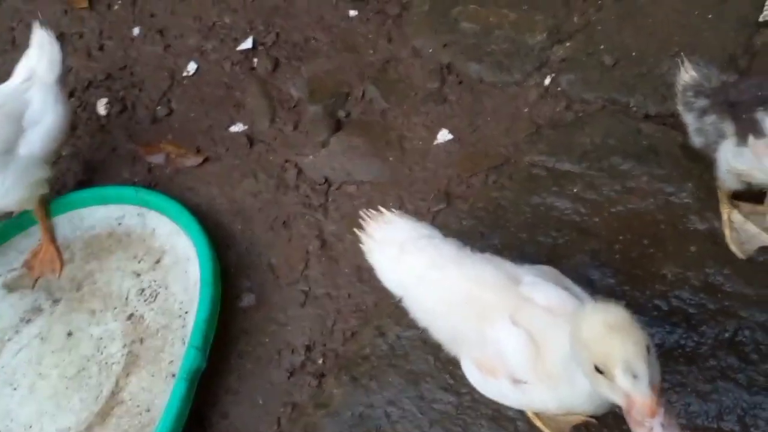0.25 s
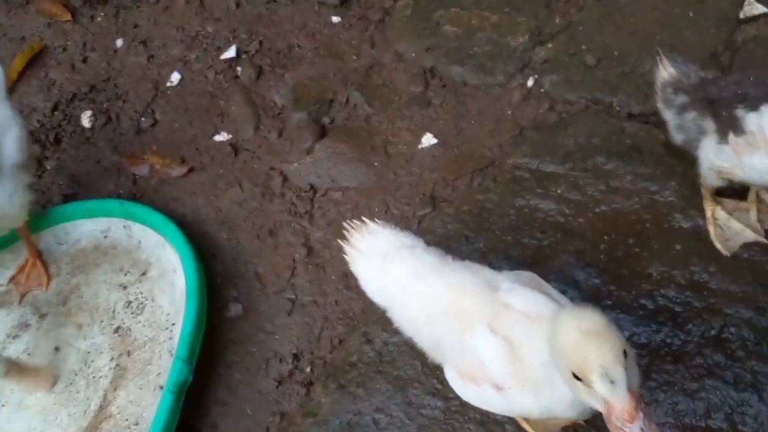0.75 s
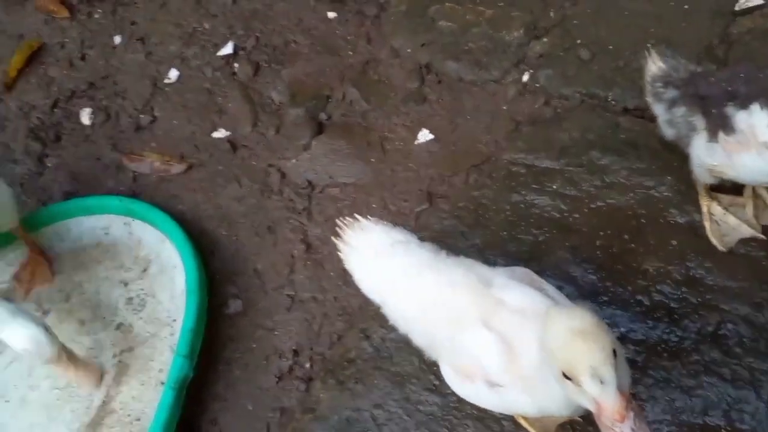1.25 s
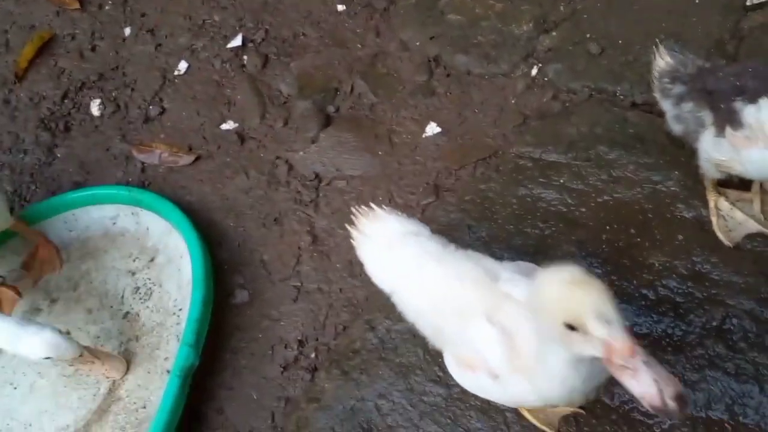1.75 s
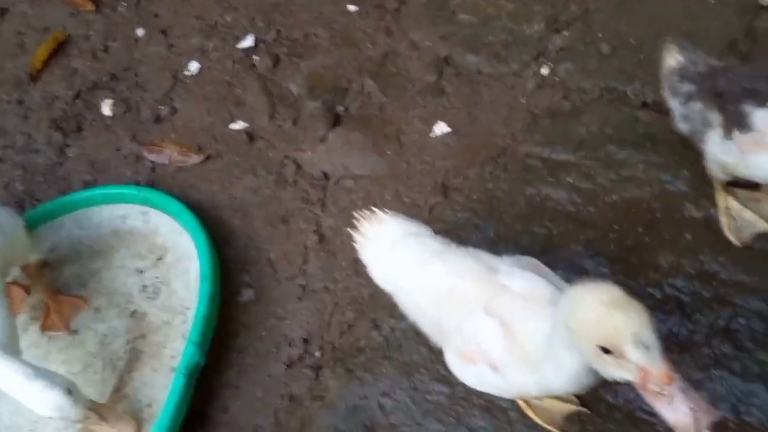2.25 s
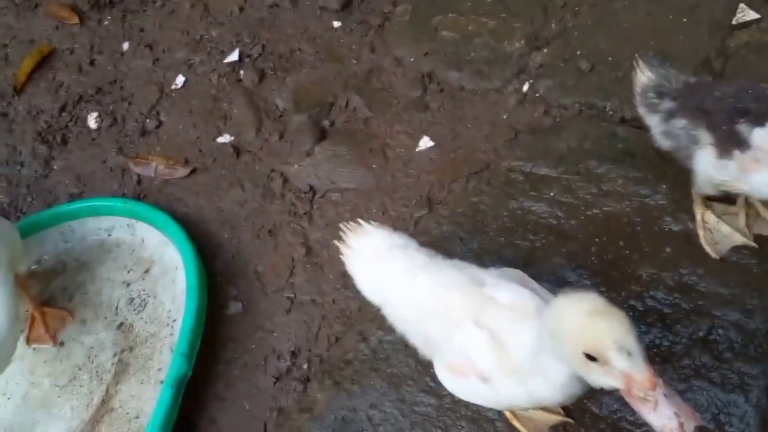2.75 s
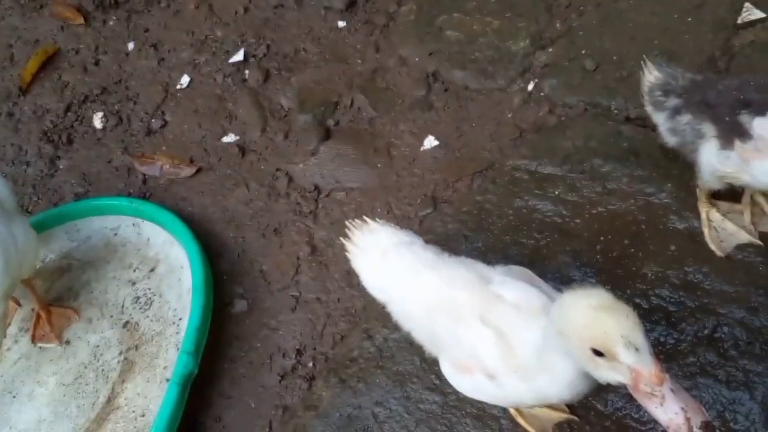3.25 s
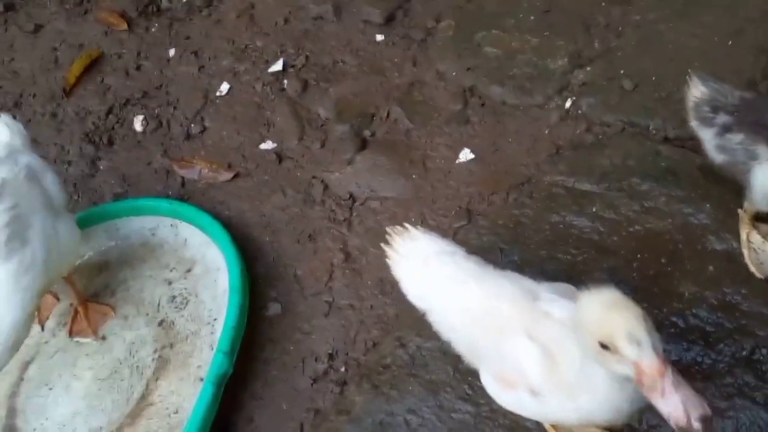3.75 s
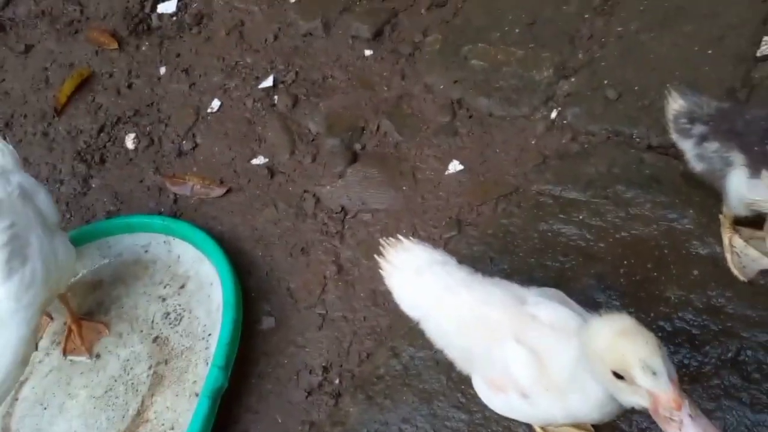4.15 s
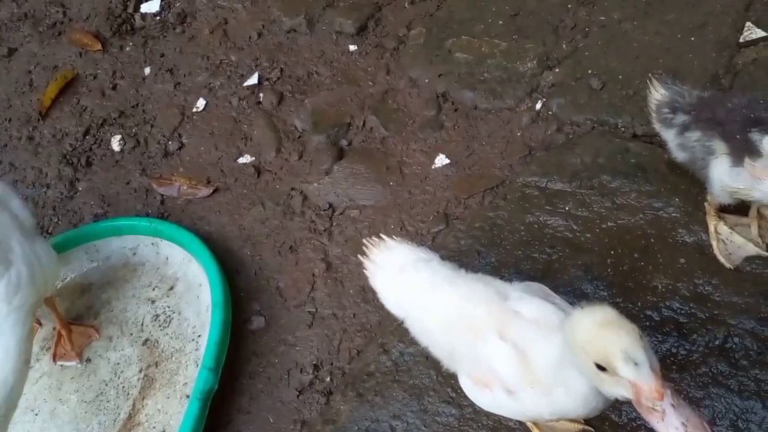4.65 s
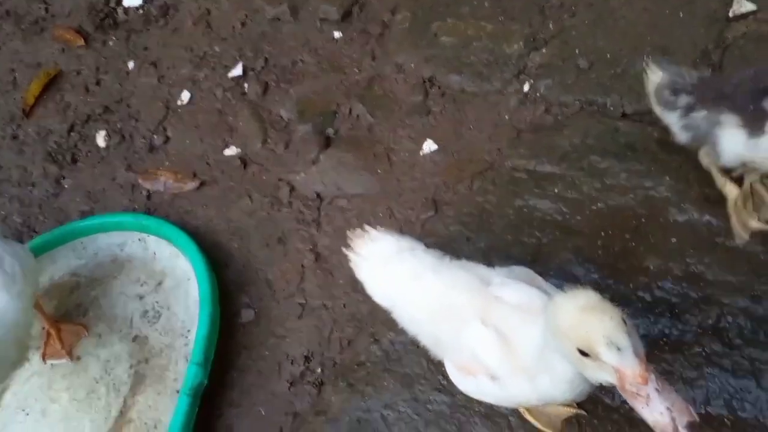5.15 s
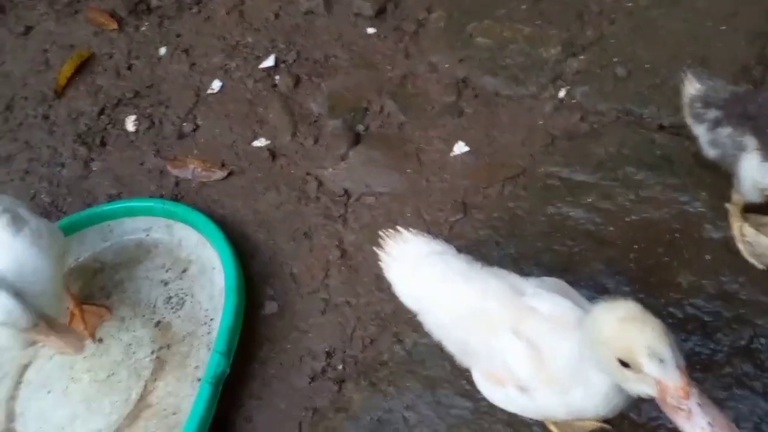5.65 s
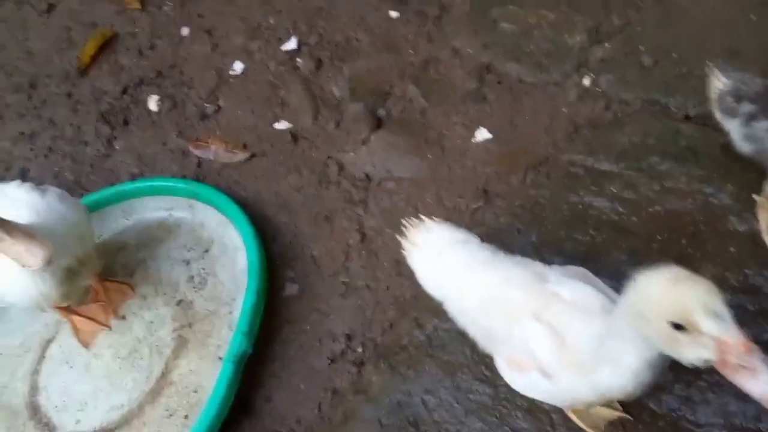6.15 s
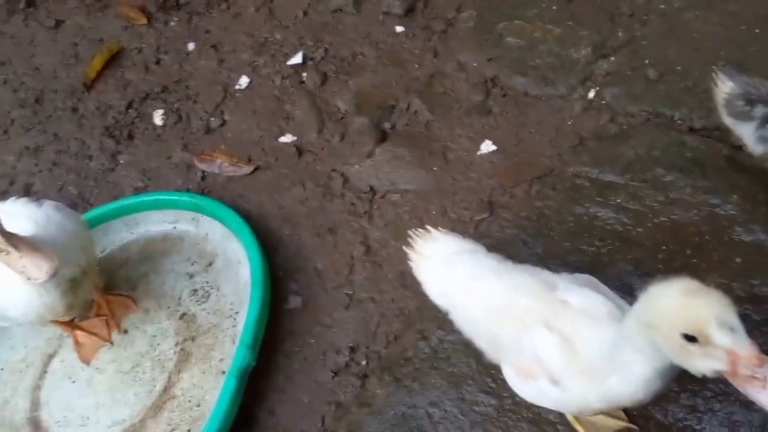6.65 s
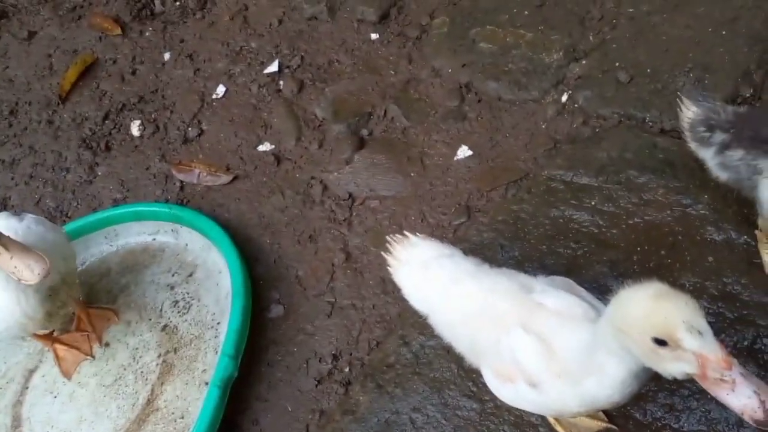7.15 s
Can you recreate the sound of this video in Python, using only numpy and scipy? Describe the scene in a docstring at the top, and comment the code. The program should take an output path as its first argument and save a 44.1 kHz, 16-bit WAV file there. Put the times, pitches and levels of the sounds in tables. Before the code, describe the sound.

Close outdoor sound of young ducks at a shallow plastic basin. At 0.2-0.4 s come three soft, high, wavering peeps, with a few drips. Around 0.8-1.4 s water is stirred and splashed, feet and bill knock the plastic hollowly, and brighter peeps sound at 1.2-1.3. Short hoarse quacks come at 1.5 and 1.9, the latter joined by a strong piercing peep, with a dull thump at 2.0. Peeps run at 2.3-2.5, then faint sliding whines until 3.3. Knocks and sloshing cluster at 3.0-3.9, with two peeps near 3.5. From 4.6 to 5.9 clipped raspy quacks alternate with runs of peeps; a short sizzling hiss passes at 4.9-5.1. Water is churned at 6.0, two knocks follow near 6.35, a quack at 6.6, and final peeps around 7.2. Faint distant chirps, a softly pulsing insect and quiet air continue underneath, with slight yard echo.

```python
"""Wavy peeps in runs and short hoarse quacks: half-grown ducklings beg nearby on wet ground, voices breaking.
The peeps are gliding tones with a faint overtone; the quacks are pulse trains ringing a throat filter.
One dabbles and steps in a shallow plastic basin: blows ring decaying modes, and water is streams of bubbles.
Farther off a small bird chirps and an insect pulses in outdoor air; decaying noise gives a short yard echo."""
import sys
import numpy as np
from scipy import signal
from scipy.fft import rfft, irfft, next_fast_len
from scipy.io import wavfile
from scipy.ndimage import map_coordinates

SR = 44100
rng = np.random.default_rng(int(sys.argv[2]) if len(sys.argv) > 2 else 0)


def pcm_store(signal):
    """Save signal as 16-bit PCM."""
    levels = np.round(np.clip(np.atleast_2d(signal), -1, 1) * 32767)
    wavfile.write(sys.argv[1], SR, levels.astype(np.int16).T)


N = 326340

# Quacks: (time [s], length [s], starting pitch [Hz], chest gain [dB], mouth resonance [Hz],
#          brightness [dB], level of the whistle that leads in [dB])
QUACK_CALLS = [(1.482, 0.05, 256.2, 3.5, 1740, -14, -23), (1.924, 0.05, 252.2, 2.5, 900, -15.5, -26),
               (4.557, .047, 230.5, 2, 1180, -16.5, -36), (4.871, 0.061, 258.6, 7.5, 925, -13, -35),
               (5.218, 0.068, 213.8, -4, 1190, -8.5, -39), (5.542, .05, 240.4, -2, 1380, -9.5, -42),
               (5.871, 0.045, 218.4, -6, 1880, -8.5, -26), (6.631, 0.056, 226.8, -8.5, 1830, -10, -26)]
# How hard the water is stirred: (time [s], level [dB])
STIRRING = [(0.0, -43.5), (0.72, -44.5), (1.03, -31.5), (1.4, -38), (1.63, -45), (2.21, -41), (2.43, -56.5),
            (3.26, -65), (3.4, -45), (3.61, -38.5), (4.88, -44), (4.97, -52.5), (5.87, -47), (6.02, -32),
            (6.18, -44.5), (6.74, -41), (7.11, -55), (7.4, -67)]


def amp(db):
    """Amplitude ratio of a level: 20 dB is a factor of ten."""
    return 10 ** (np.asarray(db) / 20)


def unit(x):
    """Normalise the mean power, so that the rms is 1."""
    return x / np.sqrt(np.mean(x ** 2) + 1e-20)


def along(points, hz):
    """Interpolate (frequency [Hz], value) points on a logarithmic frequency axis."""
    f, v = np.transpose(points)
    return np.interp(np.log(hz + 1), np.log(f + 1), v)


def curves(rows):
    """Piecewise-linear envelopes: one value per sample for each column after the time."""
    s, *cols = np.transpose(rows)
    return [np.interp(np.arange(N) / SR, s, c) for c in cols]


def clock(length):
    """Sampled time axis of a short sound [s]."""
    return np.arange(int(length * SR)) / SR


def wobble(rate, size=N):
    """Band-limited random modulation: a smooth curve through rate random knots a second."""
    knots = rng.standard_normal(int(size * rate / SR) + 4)
    return map_coordinates(knots, [np.arange(size) * rate / SR])


def add(track, s, sound):
    """Superposition: add a sound to a track from time s [s]."""
    part = track[max(round(s * SR), 0):][:len(sound)]
    part += sound[:len(part)]


def coloured(x, db_of_hz):
    """Minimum-phase filter: folding the real cepstrum makes the given gain curve causal."""
    m = 2 * next_fast_len(len(x) // 2 + 2048)
    gain = amp(db_of_hz(np.fft.rfftfreq(m, 1 / SR)))
    cepstrum = irfft(np.log(gain + 1e-6))
    cepstrum[1:m // 2] *= 2
    cepstrum[m // 2 + 1:] = 0
    return irfft(rfft(x, m) * np.exp(rfft(cepstrum)))[:len(x)]


def noise(spectrum, size=N):
    """Filtered white noise of rms 1 with a (frequency [Hz], gain [dB]) spectrum."""
    return unit(coloured(rng.standard_normal(size), lambda f: along(spectrum, f)))


def phase_of(hz):
    """Phase [rad] as the running integral of a pitch curve."""
    return 2 * np.pi * np.cumsum(hz) / SR


def peeps():
    """Frequency modulation through a resonance: pitch crests, dips and crests; the throat band sets loudness."""
    # Peeps: (time of the dip [s], dip pitch [Hz], last crest before overshoot [Hz], relative level [dB])
    peep_calls = [(.198, 2630, 3240, -18.5), (.279, 2610, 2990, -18), (0.397, 2636, 2840, -14),
                  (1.22, 2606, 2920, -15.5), (1.322, 2785, 2930, -9), (1.798, 2580, 3180, -23),
                  (1.889, 2844, 3500, -2), (2.298, 2480, 2615, -23.5), (2.37, 2550, 2990, -16),
                  (2.491, 2716, 3165, -7.5), (3.458, 2555, 2820, -20.5), (3.554, 2683, 2864, -10.5),
                  (4.707, 2430, 2740, -26.5), (4.797, 2596, 3090, -13.5), (4.894, 2660, 2960, -11),
                  (5.025, 2628, 2900, -9), (5.646, 2560, 2920, -23.5), (5.733, 2814, 3340, -9.5),
                  (5.876, 2720, 3010, -14), (7.141, 2546, 2740, -25), (7.239, 2685, 3395, -15)]
    # Breath pressure through a peep: (swings from its dip, level [dB])
    breath_push = [(-2, -28), (-1.1, -17), (-.55, -3), (0, -3), (.65, 0), (1, -6.5), (1.4, -15), (2, -29)]
    # Throat gain: open at low pitch, a dip near 2600 Hz, closing above 3 kHz: (frequency [Hz], gain [dB])
    throat_gain = [(2200, 2.5), (2600, -4.5), (2950, -1.5), (3080, -6.5), (3220, -17), (3600, -22)]
    breath_spectrum = [(1500, -17), (2600, -18), (3400, 8.5), (4500, -10.0), (7000, -6.5), (10000, -12)]
    usual_db, jitter, second_db, breath_db = -14.5, .018, -30, -31
    overshoot, overshoot_swings = .25, .2  # share of the last swing, and its duration in swings
    out = np.zeros(N)
    for s, dip_hz, last_hz, db in peep_calls:
        harder_db = db - usual_db
        # time from dip to crest [s]: wider swings and softer peeps take longer
        half = .018 + .013 * (last_hz - dip_hz) / 1000 - .0003 * harder_db
        first_hz = dip_hz * (1.22 + .009 * harder_db)  # a harder peep has a higher first crest
        swell_db = 4.5 - .25 * harder_db  # a soft peep swells more towards its end

        u = clock(4 * half) / half - 2
        leg = np.floor(u) + (1 - np.cos(np.pi * (u % 1))) / 2  # cosine glide between turning points
        hz = np.interp(leg, np.arange(-2, 3), [2500, first_hz, dip_hz, last_hz, 2250])
        hz = hz + overshoot * (last_hz - dip_hz) * np.exp(-((u - 1) / overshoot_swings) ** 2)
        hz = hz * (1 + jitter * np.abs(u) * wobble(714, len(u)))  # steady in the middle, ragged at the ends

        push = amp(db + np.interp(u, *np.transpose(breath_push)) + swell_db * np.clip(u, -1, 1))
        push = push * amp(2.5 * np.abs(u) * wobble(300, len(u)))  # the weak ends flicker

        phase = phase_of(hz)
        overtone_gain = amp(second_db + 3 * wobble(400, len(u)))
        overtone = overtone_gain * np.sin(2 * phase + .5 * wobble(900, len(u)))
        breath = amp(breath_db) * noise(breath_spectrum, len(u))
        reediness = np.maximum(push / amp(-14), amp(-30)) ** -.3  # soft notes are reedier than loud ones
        note = amp(along(throat_gain, hz)) * np.sin(phase) + reediness * overtone + breath
        add(out, s - 2 * half, push * note * signal.windows.tukey(len(u), .1))
    return out


def quacks():
    """Source-filter voice: the syrinx slaps shut 210-280 times a second; slaps and air puffs ring the throat."""
    # Effort through a quack: (share of its length, level [dB])
    effort_curve = [(0, -3.5), (.2, 9.5), (.45, 15), (.7, 0.5), (1, 9.5)]
    # Throat and bill transfer function: (frequency [Hz], gain [dB])
    throat_gain = [(120, -19), (230, 6.5), (500, 0.5), (680, -4.5), (950, -4), (1300, -3), (1850, -3),
                   (2250, -3.5), (3000, -8.5), (3800, 0), (4900, -8), (5650, -5.5), (6900, -14),
                   (12000, -30.5)]
    puff_spectrum = [(300, -1.0), (900, 12.0), (3000, 9)]
    level_db, pitch_rise = -15, .06  # rms while sounding; share of the pitch gained
    mouth_db, mouth_width, slack_db = 7, .098, -14
    clear_hz, clear_rough, rough_per_hz = 220, .22, .012  # hoarser above the easy pitch
    out = np.zeros(N)
    for s, length, pitch_hz, chest_db, mouth_hz, bright_db, _ in QUACK_CALLS:
        rough = np.clip(clear_rough + rough_per_hz * (pitch_hz - clear_hz), 0, 1)
        u = clock(length) / length
        hz = pitch_hz * (1 + pitch_rise * u) * (1 + .06 * rough * wobble(400, len(u)))
        turns = phase_of(hz) / (2 * np.pi)
        slaps = unit(np.diff(np.floor(turns), prepend=-1))
        puffs = unit(rng.standard_normal(len(u)) * np.exp(-3 * (turns % 1)))
        puffs = coloured(puffs, lambda f: along(puff_spectrum, f))
        effort = amp(np.interp(u, *np.transpose(effort_curve)) + 2.9 * rough * wobble(380, len(u)))
        source = effort * (slaps - slaps.mean() + .7 * rough * puffs)

        def tense_db(f):
            """Vocal-tract resonance: throat, chest, brightness and a mouth peak add in dB."""
            mouth = mouth_db * np.exp(-(np.log((f + 1) / mouth_hz) / mouth_width) ** 2)
            chest = along([(500, chest_db), (900, 0)], f)
            brightness = along([(1900, 0), (4500, bright_db)], f)
            return along(throat_gain, f) + chest + brightness + mouth

        def slack_tone_db(f):
            """Spectral tilt: a slack voice has weaker high frequencies."""
            return tense_db(f) + along([(1500, 0), (4000, slack_db)], f)

        # the edge comes after the first slaps and fades early
        tense = np.interp(u, [0, .22, .45, 1], [0.19, 1, 0.75, 0.42])
        room_to_ring = ((0, 0), (0, SR // 50))
        hard, soft = np.pad([source * tense, source * (1 - tense)], room_to_ring)
        voice = dispersed(coloured(hard, tense_db) + coloured(soft, slack_tone_db))
        add(out, s, amp(level_db) * voice / np.std(voice[:len(u)]))
    return out


def dispersed(x, lag=.0022):
    """Dispersion: the windpipe draws each slap out, delaying higher frequencies by up to lag [s]."""
    hz = np.fft.rfftfreq(len(x), 1 / SR)
    delay = lag * (1 - np.exp(-hz / 2500))
    cycles = np.cumsum(delay) * hz[1]  # phase is the integral of group delay
    return irfft(rfft(x) * np.exp(-2j * np.pi * cycles), len(x))


def slurs():
    """Pitch glides: soft notes between the peeps, and a falling whistle that breaks into each quack."""
    # Soft slurred notes: (time [s], length [s], from pitch [Hz], to pitch [Hz], level [dB])
    soft_notes = [(0.137, 0.078, 1050, 1395, -29), (0.718, 0.077, 2200, 2600, -39.5),
                  (0.784, 0.038, 2850, 2450, -33), (1.139, .089, 1685, 1356, -27.5),
                  (1.187, 0.026, 1454, 823, -28), (2.236, 0.057, 2330, 2740, -40),
                  (2.423, 0.065, 2800, 2370, -35), (2.518, 0.096, 2790, 2430, -37),
                  (2.596, 0.07, 1008, 1250, -40.5), (2.979, 0.083, 2550, 2240, -42),
                  (3.064, .085, 3140, 2120, -37), (3.172, 0.072, 2635, 2180, -36),
                  (3.31, .059, 2600, 2120, -41.5)]
    out = np.zeros(N)
    for s, length, from_hz, to_hz, db in soft_notes:
        rough = .78 * 1100 / from_hz  # higher notes are cleaner
        add(out, s, amp(db) * slur(length, from_hz, to_hz, rough))
    for s, *_, db in QUACK_CALLS:
        add(out, s - .01, amp(db) * slur(.0277, 1650, 1054, rough=.28))
    return out


def slur(length, from_hz, to_hz, rough):
    """Frequency and amplitude modulation: a gliding whistle of rms 1 that flutters when rough."""
    n = int(length * SR)
    phase = phase_of(np.linspace(from_hz, to_hz, n) * (1 + 0.079 * rough * wobble(678, n)))
    tone = np.sin(phase) + 0.31 * rough * np.sin(2 * phase)
    tone = tone * (1 + rough * wobble(458, n))
    return unit(tone * signal.windows.tukey(n, .7))


def knocks():
    """Modal synthesis: each blow rings the basin's modes at new strengths; sharp blows favour the high ones."""
    # Blows of feet and bills on the basin: (time [s], peak level [dB], sharpness [dB per octave])
    strong_blows = [(.562, -26, -2), (.95, -13, -1), (1.004, -17.5, 1), (1.012, -12, 7),
                    (1.333, -14.5, 0.5), (1.646, -18, -2.5), (1.99, -10.5, -9), (2.33, -13.5, -4.5),
                    (2.954, -21.5, 2.5), (3.001, -16.5, 3), (3.288, -10.5, 1), (3.378, -21.5, -2.5),
                    (3.623, -13.5, -4), (3.72, -13.5, -1), (3.846, -9, -3.5), (5.464, -19, -7),
                    (6.317, -15.5, -6), (6.388, -17.5, -1.5)]
    # Basin modes, damped by its water: (mean frequency [Hz], relative level [dB], decay time t60 [s])
    basin_modes = [(310, -13, .06), (755, -1, .05), (1050, -7, .035), (1300, -7, .03), (1500, -5, .03),
                   (1750, -6, .035), (2080, -6, .03), (2500, -14, .03)]
    slap_spectrum = [(200, -13), (700, 5.5), (2200, 1.0), (5000, -11.0), (12000, -26)]
    slap_gain, slap_t60, onset_s = .62, .021, .00063
    out, t = np.zeros(N), clock(.15)
    for s, db, sharp_db in strong_blows + taps():
        load = rng.normal(1, .04)  # the shifting water retunes the basin
        ring = np.zeros(len(t))
        for hz, mode_db, t60 in basin_modes:
            strength_db = mode_db + 2 * rng.standard_normal() + sharp_db * np.log2(hz / 1000)
            ring += amp(strength_db - 60 * t / t60) * np.sin(2 * np.pi * (hz * load * t + rng.random()))
        slap = slap_gain * noise(slap_spectrum, len(t)) * amp(-60 * t / slap_t60)
        hit = (ring + slap) * (1 - np.exp(-t / onset_s))
        add(out, s - .001, amp(db) * hit / np.abs(hit).max())
    return out


def taps(per_s=6, over_stirring_db=9.5, scatter_db=.5):
    """Random point process: light bill taps follow the stirring; rows of (time, peak level, sharpness)."""
    draws = rng.random((int(per_s * N / SR), 3))
    s = draws[:, 0] * N / SR
    strength, sharpness = scatter_db * (2 * draws[:, 1:].T - 1)
    peak_db = np.interp(s, *np.transpose(STIRRING)) + over_stirring_db + strength
    return list(zip(s, peak_db, sharpness))


def water():
    """Bubble resonance: a bill churns shallow water into small bubbles coloured by the basin, over deep gulps."""
    # Basin's colouring of the churn: (frequency [Hz], gain [dB])
    churn_gain = [(180, -14), (300, -28), (388, -8), (473, -13), (757, -3.5), (860, -3.5), (1010, -3),
                  (2050, -0.5), (2570, -5), (4060, -4), (4740, -10.5), (5790, -18), (9000, -48),
                  (11700, -83), (19800, -120)]
    # A foot or bill shoves water aside: (time [s], length [s], bubbles level [dB], deep gulps level [dB])
    shoves = [(0.848, 0.15, -33.5, -62), (1.338, 0.12, -44, -33.5), (3.468, 0.21, -38.5, -31.5),
              (4.811, 0.057, -43, -27), (5.956, 0.26, -45, -42)]
    wash_spectrum = [(120, -24.5), (230, -8.5), (400, -8.0), (700, -2.5), (1400, -39.0)]
    stirring = amp(curves(STIRRING)[0] + 2 * wobble(14))
    smacks = amp(2.8 * wobble(75))  # the bill works in quick uneven bites
    churn = smacks * (bubbles(900, 1250, .55, 4, 3.5) + .7 * rng.standard_normal(N))
    churn = unit(coloured(churn, lambda f: along(churn_gain, f)))
    # the churning keeps the basin's main mode ringing
    hum = unit(signal.lfilter(*signal.iirpeak(775, 18, SR), churn))
    gulps = bubbles(600, 379, .313, 4.7, 1.2) + .91 * noise(wash_spectrum)
    dabble_gain = amp(.5) * stirring + strokes([(s, length, db) for s, length, db, _ in shoves])
    slosh_gain = amp(-15) * stirring + strokes([(s, length, db) for s, length, _, db in shoves])
    return dabble_gain * (churn + amp(-10) * hum) + slosh_gain * unit(gulps)


def bubbles(rate, centre_hz, spread, cycles, size_db):
    """Damped oscillators: a stream of rising pings of random pitch and size, rms 1, decaying over cycles."""
    count, t = int(rate * N / SR), clock(0.098)
    when, size = rng.random((2, count, 1))
    hz = centre_hz * np.exp(spread * rng.standard_normal((count, 1)))
    strength = amp(-size_db * np.log(0.058 + size))
    grains = strength * np.sin(2 * np.pi * hz * t * (1 + 4 * t)) * np.exp(-t * hz / cycles)
    places = (when * N).astype(int) + np.arange(len(t))
    return unit(np.bincount(places.ravel(), grains.ravel())[:N])


def strokes(rows):
    """Amplitude envelope: a gain that rises, holds and falls for each (time, length, level) row."""
    gain = np.zeros(N)
    for s, length, db in rows:
        add(gain, s, amp(db) * signal.windows.tukey(int(length * SR), .6))
    return gain


def drops():
    """Impact and bubble resonance: a drop lands with a rising ring and a puff of spray; thin ticks join."""
    # Flung drops: (time [s], relative level [dB], starting pitch [Hz], relative spray level [dB])
    flung_drops = [(.4994, -22, 1890, -17), (0.6, -17, 1550, -30), (0.675, -20, 5250, -6),
                   (1.1704, -3.5, 2700, -33), (1.2322, -15, 2800, -15), (1.29, -2, 2230, -21),
                   (1.3354, -15.5, 2860, 0), (1.8174, -15, 2610, -42), (4.6446, -14, 2350, -28),
                   (5.0574, -18, 2780, 5)]
    # Thin high ticks: (time [s], relative level [dB])
    high_ticks = [(0.6751, -4), (1.274, -1), (3.7508, 2)]
    spray_spectrum = [(800, -17), (2500, 14.5), (6000, 5), (10000, -1.5), (14000, -1.0)]
    tick_spectrum = [(3000, -0.5), (9000, -7.5), (13000, 2), (16000, 5.0)]
    ring_t60, spray_t60, tick_t60 = .018, .057, .051  # [s]
    out, t = np.zeros(N), clock(.06)
    for s, db, hz, spray_db in flung_drops:
        bubble = np.sin(2 * np.pi * hz * t * (1 + 4 * t)) * amp(-60 * t / ring_t60)
        spray = noise(spray_spectrum, len(t)) * amp(-60 * t / spray_t60)
        add(out, s, amp(db - 2) * (0.62 * bubble + (0.2 + amp(spray_db - 6)) * spray))
    for s, db in high_ticks:
        tick = noise(tick_spectrum, len(t)) * amp(-60 * t / tick_t60)
        add(out, s - .002, amp(db - 21.5) * tick)
    return out


def spatter(rate=45, spray_t60=.03):
    """Shot noise: fine droplets patter down in showers, with tiny rising pings and puffs of spray."""
    # Showers of fine droplets: (time [s], length [s], level [dB])
    droplet_showers = [(.82, .18, -45), (1.03, 0.34, -40), (6.8, 0.28, -49)]
    landings = (rng.random(N) < rate / SR) * amp(4 * rng.standard_normal(N))
    puffs = signal.fftconvolve(landings, amp(-60 * clock(.06) / spray_t60))[:N]
    spray = unit(puffs * noise([(800, -13), (2500, 6), (6000, -3), (10000, 3), (14000, 3)]))
    pings = bubbles(110, 5000, .5, 18, 2.8)
    return strokes(droplet_showers) * (amp(-2) * pings + amp(-4) * spray)


def rush():
    """Amplitude-modulated noise: a brief sizzling hiss over a low rumble."""
    # Course of the rush: (time [s], hiss level [dB], rumble level before its trim [dB])
    rush_course = [(0, -85, -51), (.35, -85, -66), (4.45, -85, -66), (4.8, -70, -42), (4.88, -29, -37),
                   (5.03, -34, -42), (5.15, -57, -43), (5.35, -80, -46), (5.6, -85, -66)]
    # Hiss spectrum: (frequency [Hz], gain [dB])
    hiss_spectrum = [(2000, -17), (5000, -8), (9000, -12), (12000, -14), (12400, -1), (13600, 0),
                     (14300, -6), (15500, -6)]
    hiss_db, rumble_db = curves(rush_course)
    sizzle = unit(amp(3 * wobble(250)) * noise(hiss_spectrum))
    low = noise([(25, -18), (47, 0), (75, -7), (130, -8), (300, -35), (1000, -80)])
    return amp(hiss_db) * sizzle + amp(rumble_db - 1) * low


def far_bird():
    """Two-voiced sound: paired falling glides make chirps; single ones make whistles, and one pair a rasp."""
    # Falling chirps: (time [s], relative level [dB])
    falling_chirps = [(2.216, -44.5), (3.161, -44.5), (4.098, -46.5), (5.411, -48), (6.476, -50.5),
                      (7.128, -50.5)]
    # Thin whistles: (time [s], from pitch [Hz], to pitch [Hz], relative level [dB])
    thin_whistles = [(1.58, 5340, 5050, -57.5), (3.817, 4887, 4463, -47.5)]
    out = np.zeros(N)
    for s, db in falling_chirps:
        key = rng.normal(1, .035)  # each chirp draws its own pitch
        lower = slur(.05, 4400 * key, 3400 * key, .45)
        upper = slur(.05, 4950 * key, 4550 * key, .45)
        add(out, s, amp(db) * (lower + .6 * upper))
    for s, from_hz, to_hz, db in thin_whistles:
        add(out, s, amp(db) * slur(.13, from_hz, to_hz, rough=.17))
    # in the rasp one voice rises while the other falls
    rasp = slur(.045, 2000, 2400, 1.8) + slur(.045, 3700, 3200, 1.8)
    add(out, 2.612, amp(-43) * rasp)
    return out


def background():
    """Stationary and pulsed noise: outdoor air, and an insect's narrow band pulsing about 8 times a second."""
    # Outdoor air spectrum: (frequency [Hz], gain [dB])
    air_spectrum = [(15, -62), (25, 4), (111, 7), (185, -3), (575, -12.5), (754, -10.5), (1160, -15),
                    (1400, -18), (1650, -10.5), (2760, -9.5), (5880, -11.5), (6740, -12.5), (7920, -14.5),
                    (14800, -16), (16000, -18)]
    # Course of the air: (time [s], level before its 11 dB lift [dB])
    air_course = [(0, -60), (1.1, -55), (3, -55.5), (4.9, -54), (6.2, -59.5), (7.4, -58)]
    air = amp(curves(air_course)[0] + 11 + 0.35 * wobble(4.45)) * noise(air_spectrum)
    pulse = amp(4.5 * np.sin(phase_of(8.3 + .8 * wobble(3))))
    insect = unit(pulse * noise([(5000, -43), (6450, -8.5), (6800, 10), (7150, -9.5), (8500, -47)]))
    return air + amp(-57) * insect


def bounced(x, strength_db):
    """Early reflections: the ground and the basin wall throw the calls back onto the direct sound."""
    # Reflections: (delay [s], relative level [dB])
    reflections = [(.0011, -16.5), (.0027, -38), (.0063, -12), (0.0123, -8.5), (.019, -11)]
    out = x.copy()
    for delay, db in reflections:
        add(out, delay, amp(db + strength_db) * x)
    return out


def yard(x):
    """Diffuse reverberation: convolution with noise whose frequencies die at their own speeds."""
    # Echo decay: (frequency [Hz], decay time t60 [s])
    echo_decay = [(200, 0.22), (1200, 0.3), (4000, 0.22), (12000, 0.17)]
    hz, t, z = signal.stft(rng.standard_normal(SR // 2), SR, nperseg=256)
    decay = amp(-60 * t / along(echo_decay, hz)[:, None])
    tail = signal.istft(z * decay, SR, nperseg=256)[1]
    return signal.fftconvolve(x, np.pad(tail / np.linalg.norm(tail), (200, 0)))[:N]


def scene():
    """Mid-side stereo: direct calls are centred; independent background, drops, spatter, hiss, rumble
    and echo give width."""
    # Stereo width: (frequency [Hz], gain into the side channel [dB])
    side_gain = [(100, -41), (3000, -38), (5500, -12), (7500, -10), (15000, -11)]
    low_calls = bounced(quacks(), 0)
    high_calls = bounced(peeps() + slurs(), -9)
    basin = knocks() + drops() + spatter()
    bird = far_bird()
    bird = .45 * bird + yard(bird)  # far away: more echo than direct sound
    echo = yard(amp(-12.5) * low_calls + amp(-18.5) * high_calls + amp(-7.5) * basin)
    mid = low_calls + high_calls + basin + amp(4.5) * bird + water() + echo + background() + rush()

    spray_and_rush = rush() + drops() + spatter()
    apart = background() + amp(2) * spray_and_rush + amp(-31) * yard(low_calls)
    side = coloured(apart, lambda f: along(side_gain, f))
    return np.array([mid + side, mid - side])


def record(dry):
    """Saturation and band limits: round off the highest peaks, weaken the deepest bass, cut the top."""
    ceiling, top_hz = .88, 15950
    held = dry / (1 + (dry / ceiling) ** 6) ** (1 / 6)
    m = next_fast_len(N + SR // 2)
    hz = np.fft.rfftfreq(m, 1 / SR)
    response = amp(along([(20, -18), (42, 0)], hz)) * (hz < top_hz)
    return irfft(rfft(held, m) * response, m)[:, :N]


dry = scene()
out = record(dry)
pcm_store(out)
```